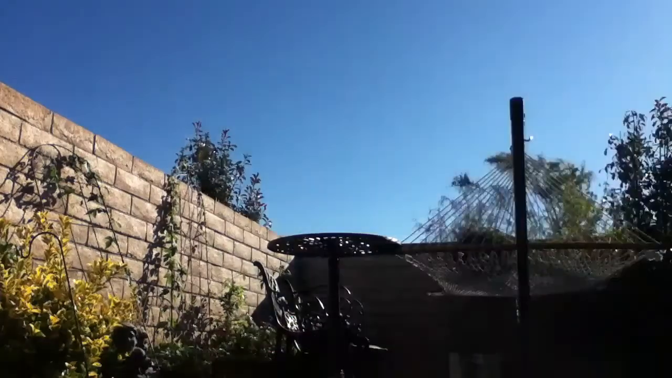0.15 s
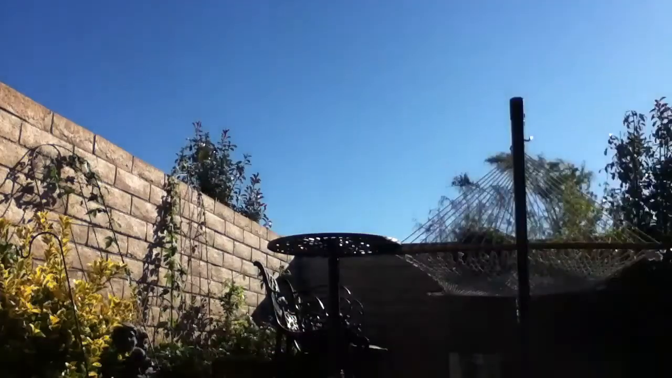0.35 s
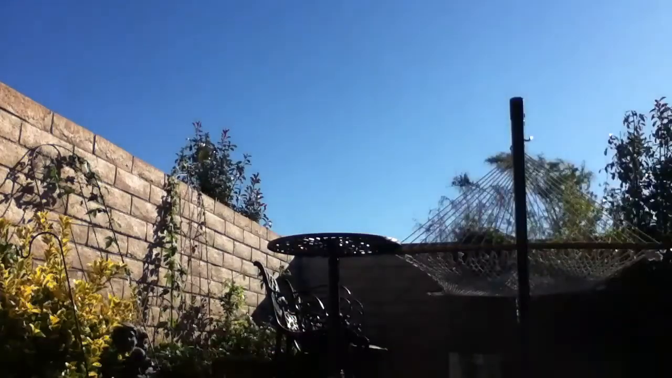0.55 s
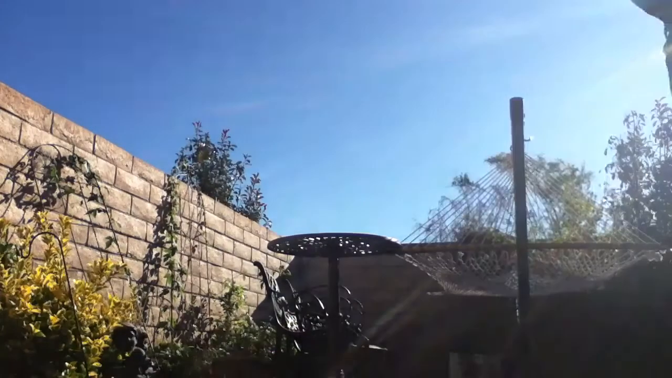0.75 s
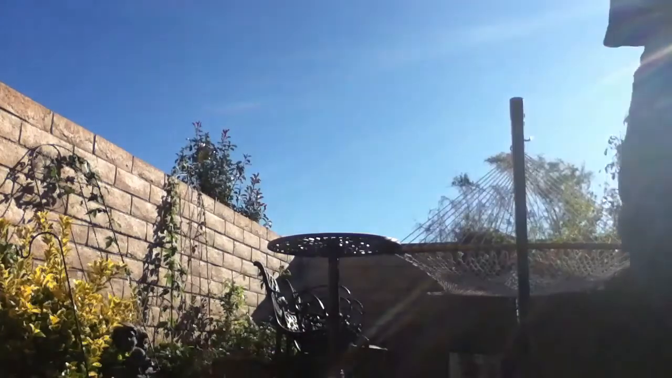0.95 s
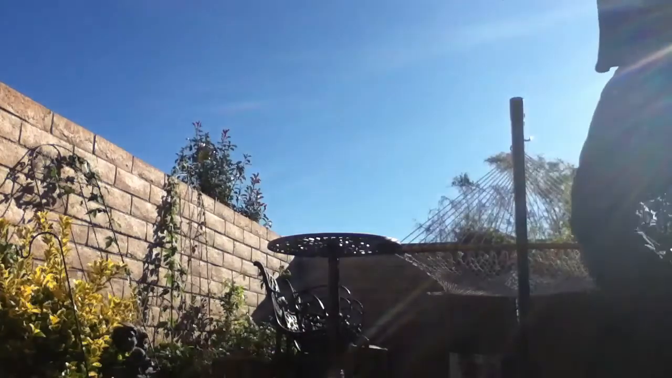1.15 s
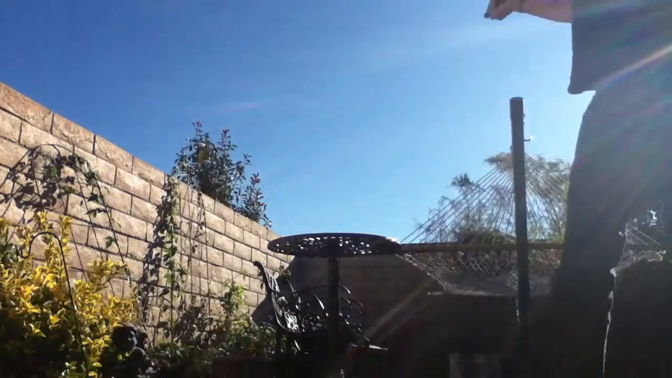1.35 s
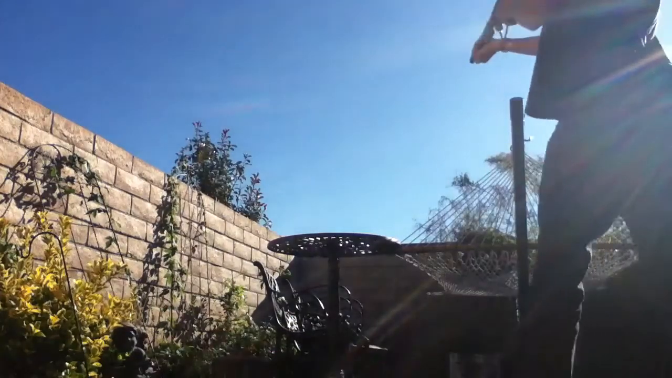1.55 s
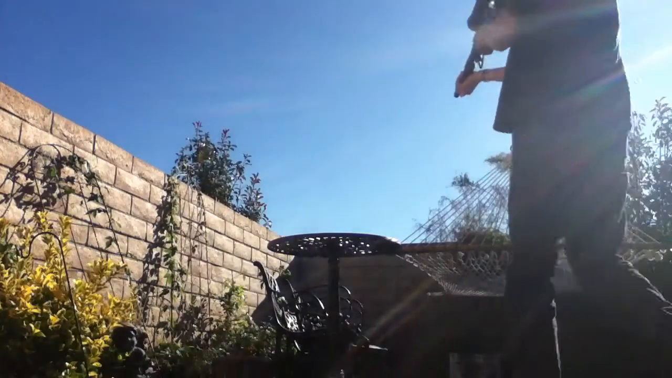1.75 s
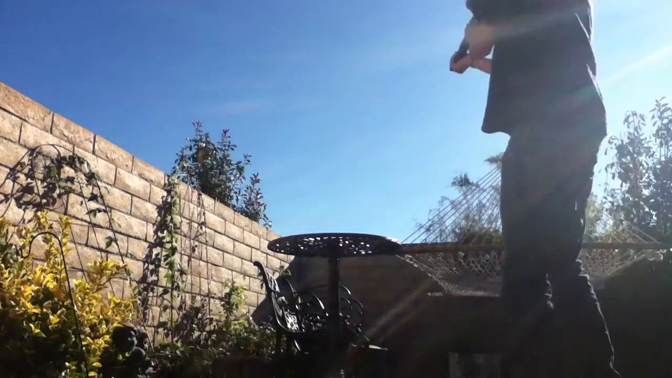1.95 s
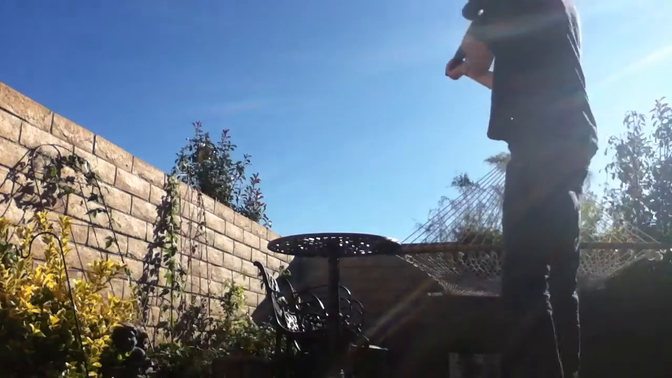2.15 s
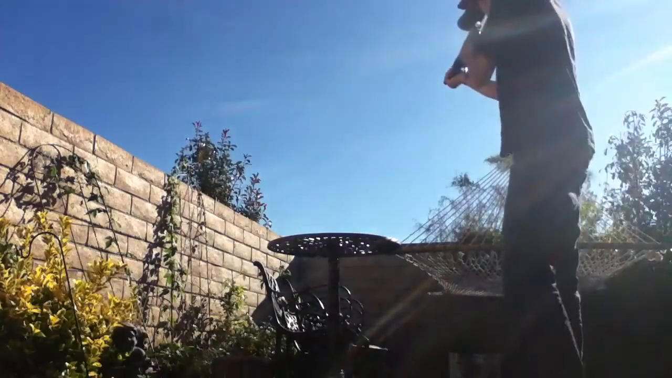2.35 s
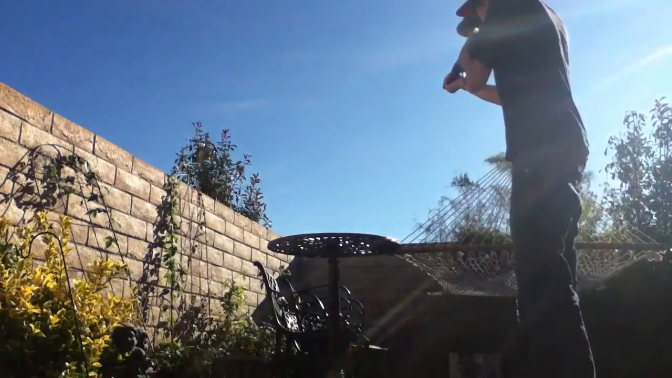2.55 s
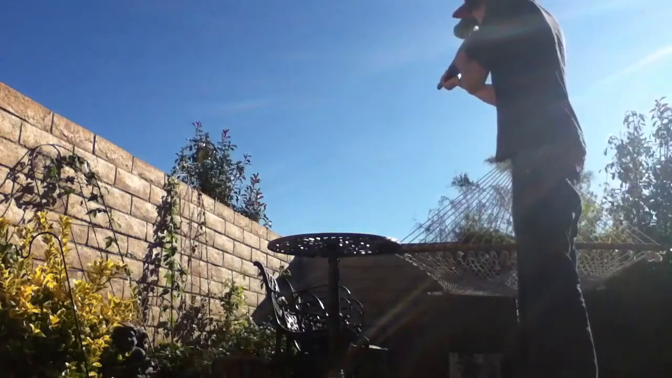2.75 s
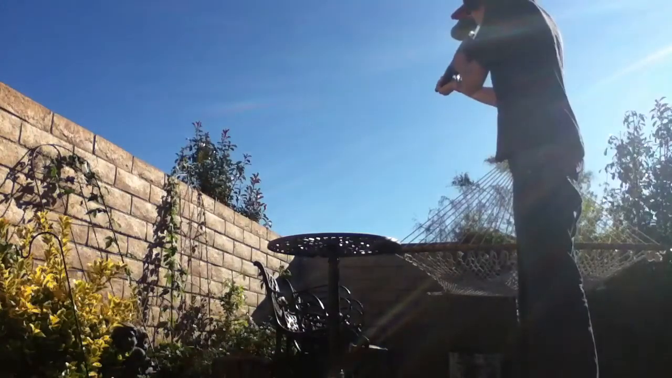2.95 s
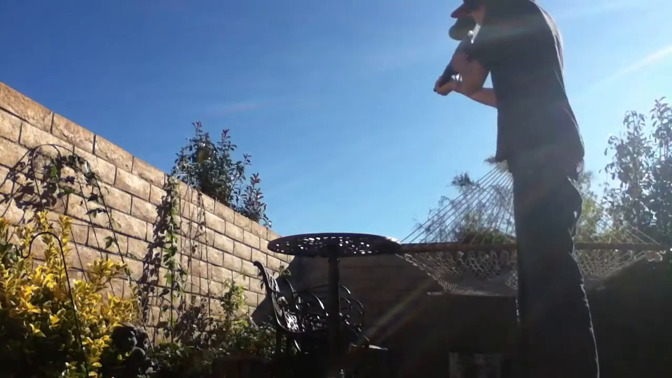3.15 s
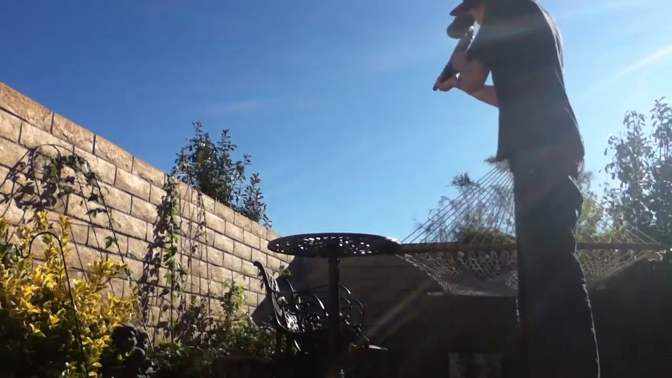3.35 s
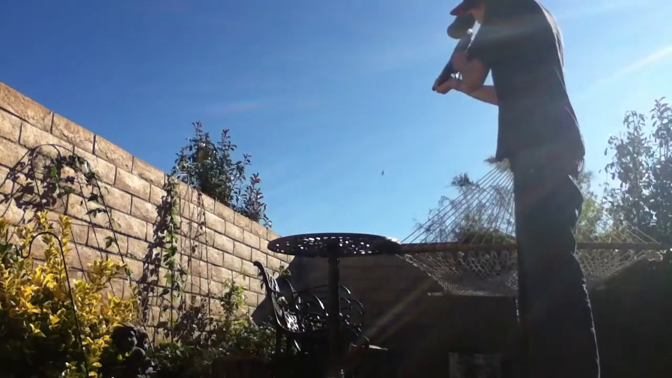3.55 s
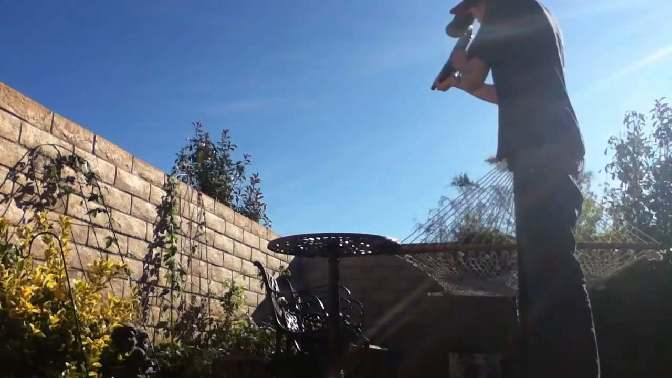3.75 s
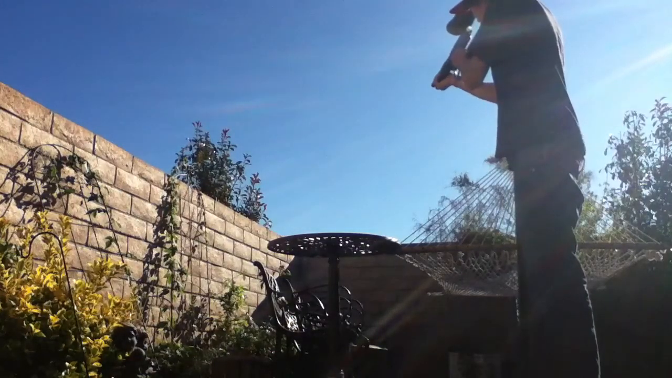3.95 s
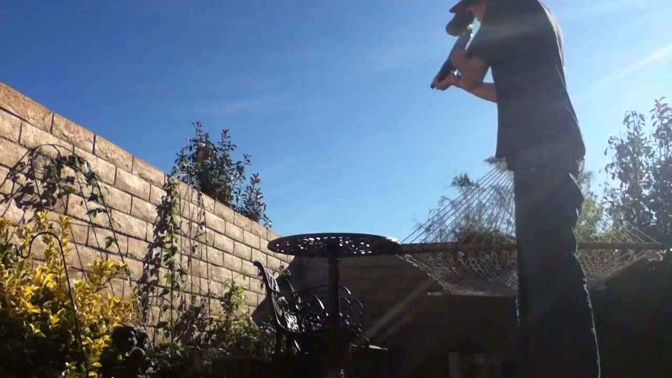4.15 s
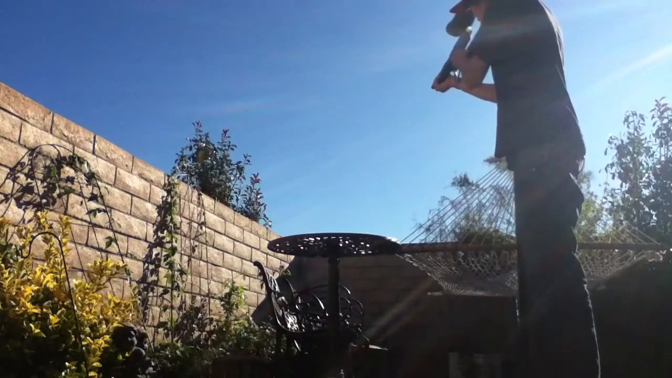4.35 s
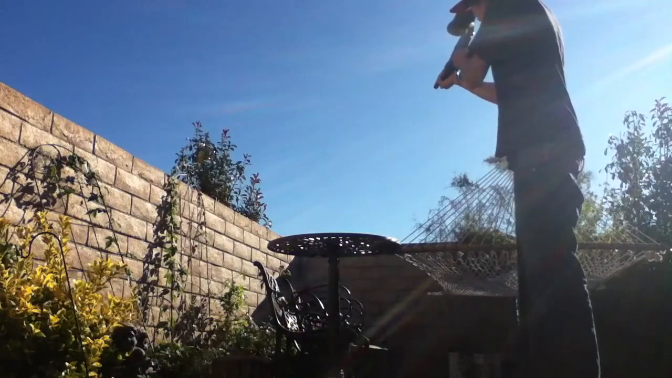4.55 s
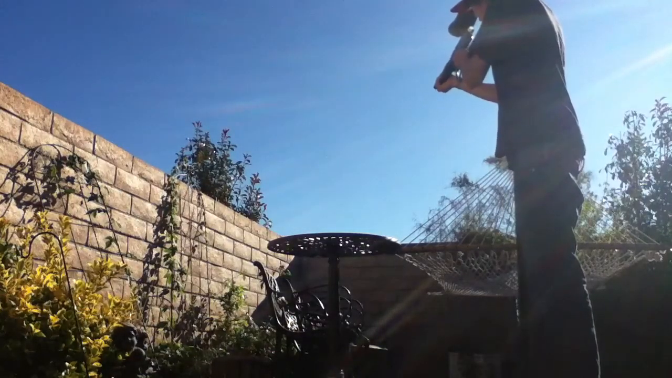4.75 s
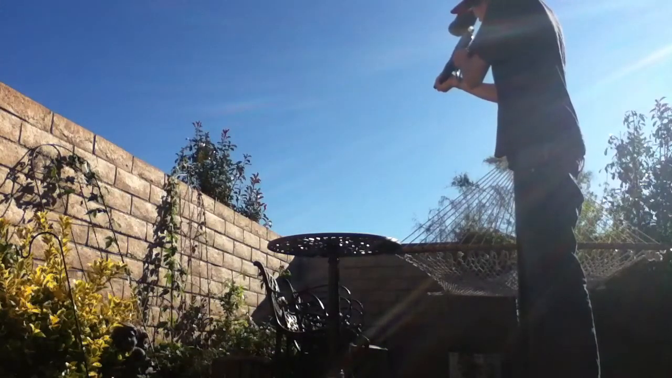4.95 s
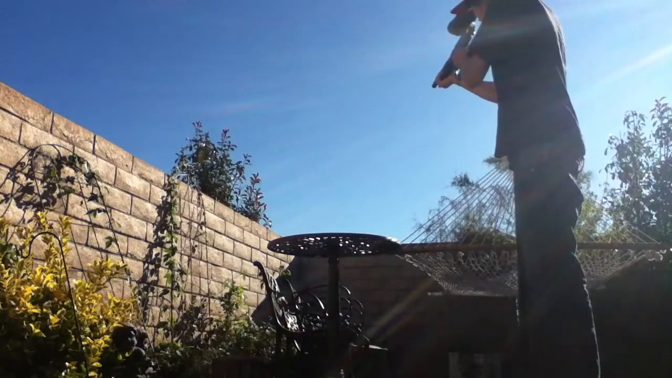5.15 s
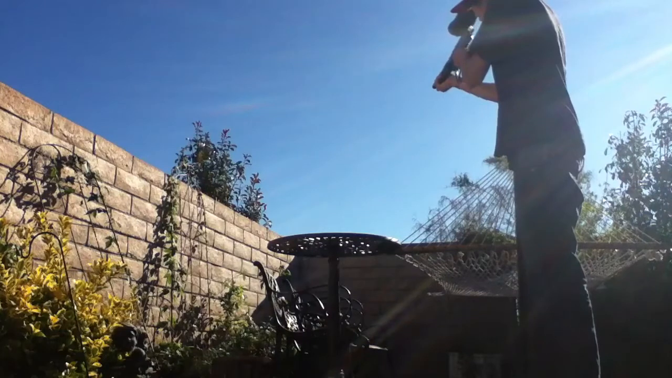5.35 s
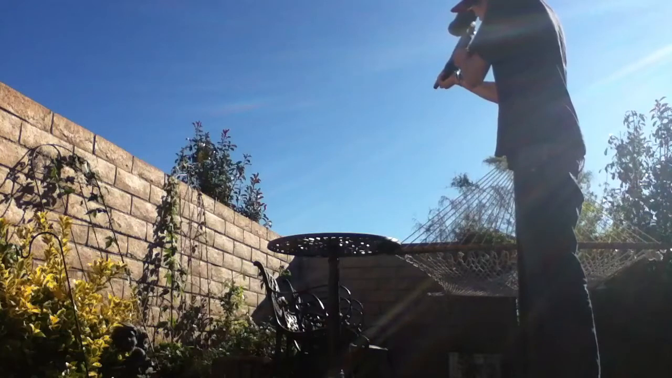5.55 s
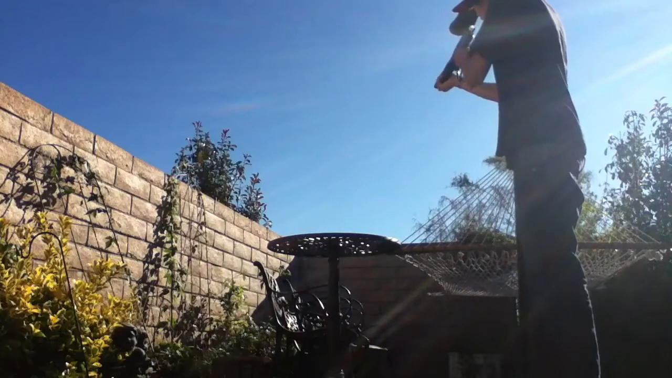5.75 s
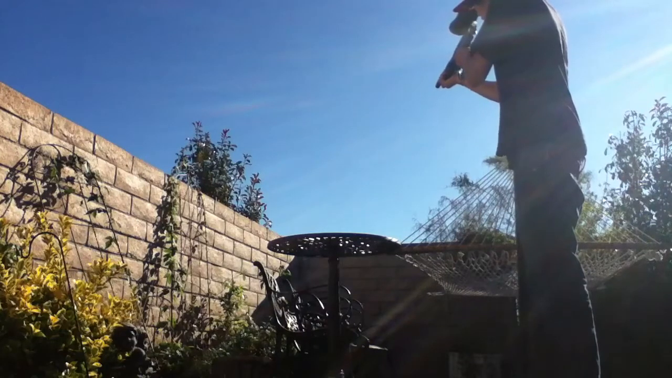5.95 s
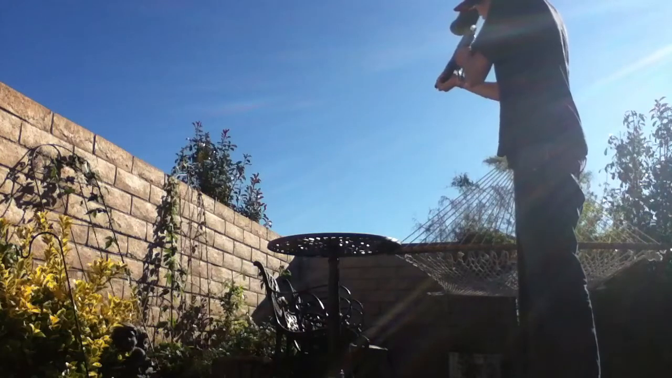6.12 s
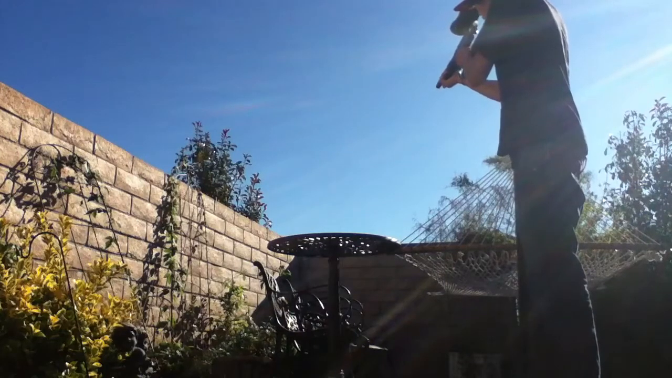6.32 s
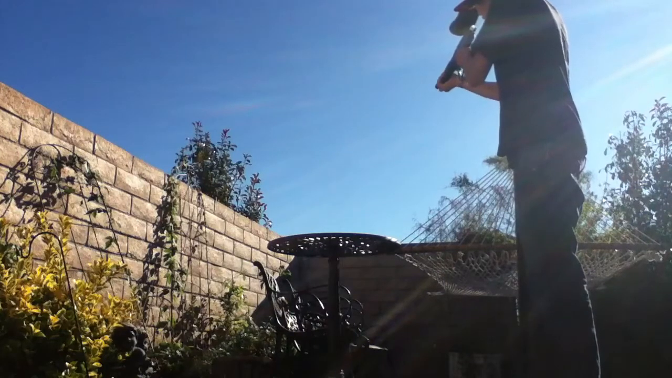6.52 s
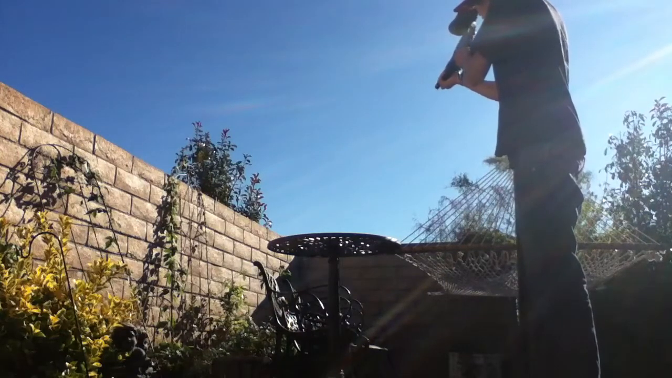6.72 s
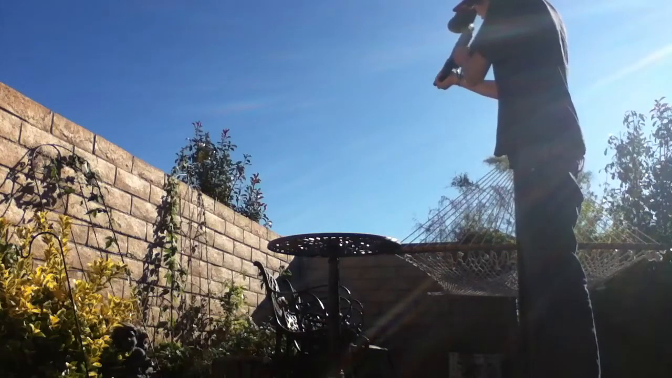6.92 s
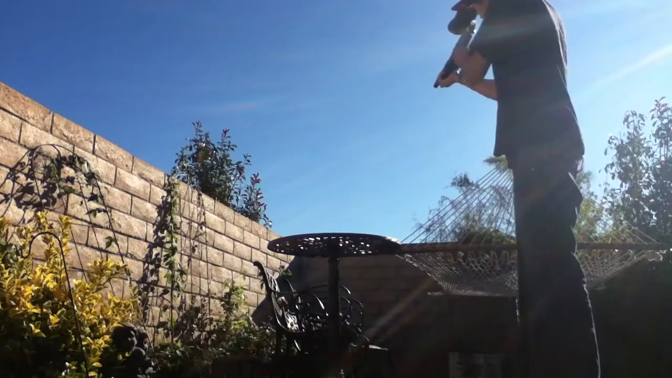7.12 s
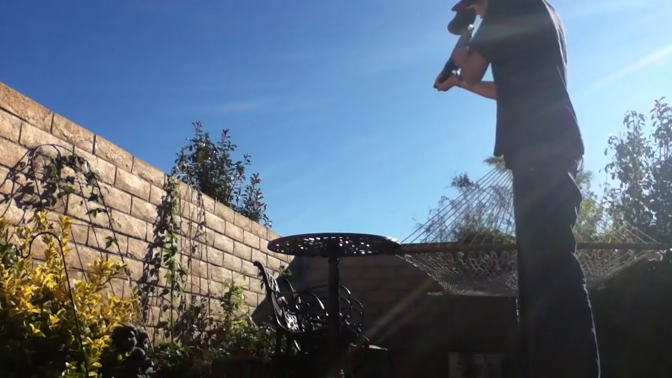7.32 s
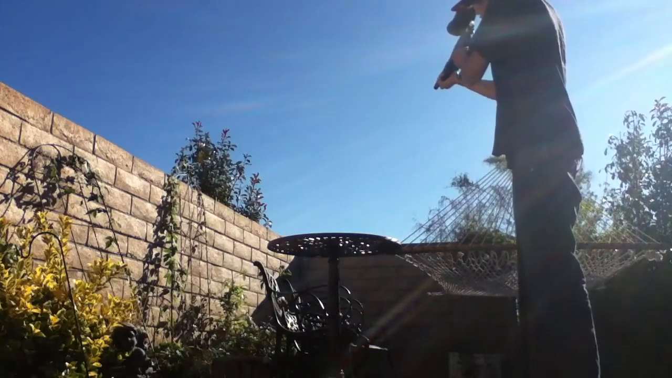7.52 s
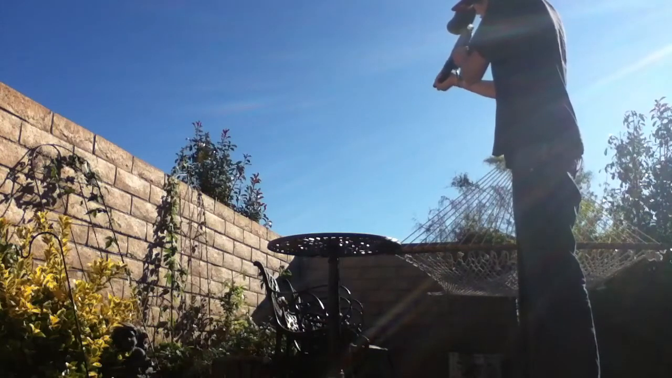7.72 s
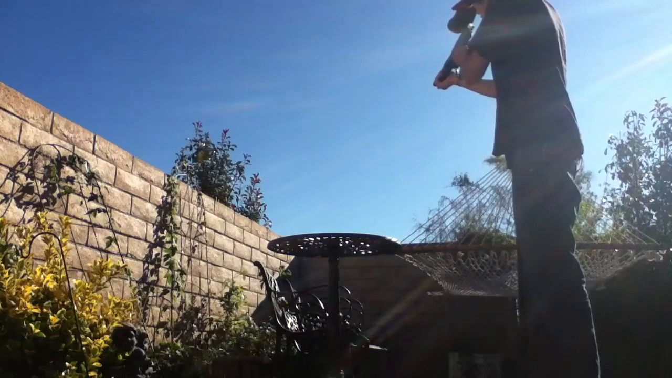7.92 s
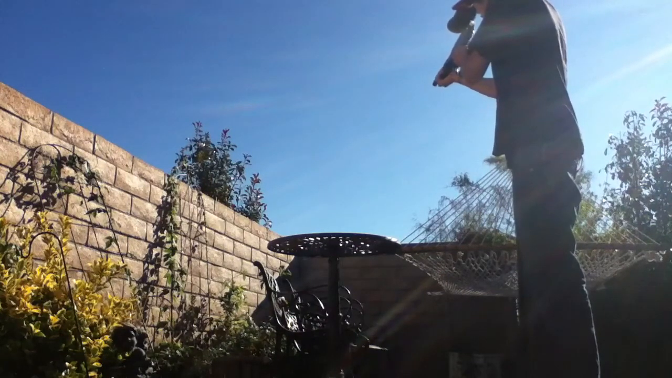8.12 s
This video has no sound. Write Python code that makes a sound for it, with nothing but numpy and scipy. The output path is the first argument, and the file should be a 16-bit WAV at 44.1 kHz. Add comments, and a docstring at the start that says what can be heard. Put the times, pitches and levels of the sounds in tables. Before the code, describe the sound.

After some scraping and soft steps on grass, a paintball gun shoots repeatedly outdoors, with metal clicks between the airy pops.

```python
"""A scrape over a far machine hum: a paintball marker is picked up, carried a few steps over grass
and fired thirteen times in a walled backyard. Before each shot the action latches with a metal click.
Each shot is a muzzle pop with a burst of gas, thrown back by ground, walls and fence;
the ball splats on a far target a tenth of a second later."""
import sys
import numpy as np
from scipy import signal
from scipy.fft import rfft, irfft, next_fast_len
from scipy.io import wavfile
from scipy.ndimage import uniform_filter1d

SR = 44100
rng = np.random.default_rng(int(sys.argv[2]) if len(sys.argv) > 2 else 0)


def to_wav(sig):
    """Store sig (one row per channel, or 1-D mono) as 16-bit WAV at the path in sys.argv[1].

    Samples outside -1..1 are clipped; the rate is SR.
    """
    pcm = np.clip(np.atleast_2d(sig), -1, 1) * 32767
    pcm = np.round(pcm).astype(np.int16)
    wavfile.write(sys.argv[1], SR, pcm.T)  # frames by channels


N = 365148
TIME_S = np.arange(N) / SR
AGE_S = TIME_S[:int(.7 * SR)]   # time within one event

# Trigger pulls. Each row: time in seconds, relative pop level in dB, relative gas level in dB.
SHOTS = [(2.5365, -18.5, -16.5), (3.22, -17, -16.5), (3.6618, -16.5, -16.5), (4.0218, -16.5, -16),
         (4.412, -16, -15.5), (5.0833, -17.5, -17.5), (5.51, -18, -18), (5.9093, -20.5, -18),
         (6.2882, -18, -17), (6.6627, -18.5, -17), (7.0408, -19, -18), (7.4656, -18, -18.5),
         (8.0789, -19, -18)]
# Ground, furniture, walls, fence. Each row: delay in seconds, relative pop and gas levels in dB.
YARD_ECHOES = [(.0044, -1, 2), (.0086, 4.5, 9), (.0099, 1.5, 0), (0.0133, -11, 1), (0.0164, 2.5, -9),
               (0.0305, -11.5, -6), (0.038, 4, 9), (0.0397, 3, -2), (0.0431, -9, 8.5), (.0492, -9, 4.5),
               (0.062, -15.5, -12)]
# Body, ground, furniture near the action. Each row: delay in seconds, relative level in dB.
NEAR_ECHOES = [(.0052, -10.5), (.0085, -12), (0.0123, -11), (0.0265, -17), (.0315, -21.5), (0.0356, -12.5)]
# Rustle of cloth, grass and spray. Each row: frequency in Hz, relative density in dB.
RUSTLE_SPECTRUM = [(500, -6), (2000, -8), (3500, 0.5), (5200, -2.5), (7000, -4), (11000, -4), (16000, -16)]


def from_db(db):
    """Decibels to gain."""
    return 10 ** (np.asarray(db) / 20)


def unit_rms(x):
    """Scale to rms 1."""
    return x / np.sqrt(np.mean(x ** 2) + 1e-20)


def butter(x, hz, kind):
    """Second-order Butterworth filter."""
    return signal.sosfilt(signal.butter(2, hz, kind, fs=SR, output="sos"), x + 1e-18)


def noise(spectrum, size=N):
    """Steady noise, rms 1; the spectrum is interpolated over log frequency."""
    n = next_fast_len(size)
    knots_hz, knots_db = np.transpose(spectrum)
    colour_db = np.interp(np.log(np.fft.rfftfreq(n, 1 / SR) + 1e-9), np.log(knots_hz), knots_db)
    return unit_rms(irfft(rfft(rng.standard_normal(n)) * from_db(colour_db), n)[:size])


def drift(rate_hz):
    """Random wander with a spread near 1."""
    return np.interp(TIME_S * rate_hz, np.arange(4096), rng.standard_normal(4096))


def fade(t60_s, delay_s=0):
    """A delayed step that dies by 60 dB in t60_s."""
    return (AGE_S >= delay_s) * from_db(-60 * np.maximum(AGE_S - delay_s, 0) / t60_s)


def ring(modes):
    """One blow on a set of damped modes."""
    return sum(from_db(db) * fade(t60_s) * np.sin(2 * np.pi * hz * AGE_S) for hz, db, t60_s in modes)


def swells(gestures, roundness=1.19):
    """Gain of rubbing gestures, each 20 dB down one rise time before its peak and one fall time after."""
    gain = np.zeros(N)
    for peak_s, db, rise_s, fall_s in gestures:
        distance = np.maximum((peak_s - TIME_S) / rise_s, (TIME_S - peak_s) / fall_s).clip(0, 10)
        gain += from_db(db - 20 * distance ** roundness)
    return gain


def play(events, sound, power=1):
    """The same sound at each (seconds, dB); a power near 2 sums energies."""
    track = np.zeros(N)
    for s, db in events:
        start = round(s * SR)
        track[start:start + len(sound)] += from_db(db) ** power * sound[:N - start]
    return track


def reflect(sound, echoes, echo_db, power=1):
    """A short sound followed by its reflections."""
    return sound + play([(delay_s, db + echo_db) for delay_s, db in echoes], sound, power)[:len(AGE_S)]


def bursts(events, envelope, spectrum, echoes, echo_db, scatter_db, direct=1,
           build_up_s=.011, loss_db_per_s_khz=9.5):
    """Noise bursts in the yard: rough walls add echoes as energy; air and foliage dull the tail."""
    # Diffuse return of near walls and far surroundings. Each row: relative level in dB, t60 in seconds.
    returns = [(-6.5, 0.42), (-22.5, 0.91)]
    early = direct * reflect(envelope ** 2, echoes, echo_db, power=1.87)
    build_up = np.minimum(AGE_S / build_up_s, 1) ** 2
    diffuse = sum((from_db(db + scatter_db) * build_up * fade(t60_s)) ** 2 for db, t60_s in returns)
    lumps = from_db(3.94 * drift(408.5)[:len(AGE_S)]) ** 2   # shrubs and furniture
    tail = np.abs(signal.fftconvolve(envelope ** 2, diffuse * lumps / (SR / 1000))[:len(AGE_S)])
    size = next_fast_len(N)
    colour = rfft(noise(spectrum, size))
    hz = np.fft.rfftfreq(size, 1 / SR)
    edges_hz = [20, 1500, 4000, 7000, 10000, 17000]
    track = np.zeros(N)
    for low, high in zip(edges_hz, edges_hz[1:]):
        loss = from_db(-loss_db_per_s_khz * np.sqrt(low * high) / 1000 * AGE_S)
        band = irfft(colour * (hz >= low) * (hz < high), size)[:N]
        track += band * np.sqrt(play(events, early + tail * loss ** 2, power=1.967))
    return track


def background(waver_rad=.28, waver_db=.05, whine_hz=14992, whine_db=-81, murmur_db=-49.5):
    """Murmur of air and far traffic, a wavering machine hum and a thin whine of electronics."""
    # Outdoor murmur. Each row: frequency in Hz, relative density in dB.
    murmur_spectrum = [(15, -69), (25, -16), (50, -35.5), (102, -5), (317, -11.5), (384, -12), (489, -16.5),
                       (575, -16), (714, -17), (936, -18), (1020, -12.5), (2160, -33), (10700, -43),
                       (14800, -45), (16000, -40)]
    # Machine hum. Each row: frequency in Hz, level in dB relative to the contour.
    partials = [(89, 2), (119.5, -10.5), (178, -7.5), (267, -7.5), (356, -14), (446, -10.5)]
    # Hum loudness. Each row: time in seconds, level in dB.
    contour = [(0, -49), (.8, -47.5), (1.2, -52), (3.6, -51.5), (4.95, -45), (6.3, -51.5), (8.28, -51.5)]
    hum = np.zeros(N)
    for hz, db in partials:
        gain = from_db(db + waver_db * drift(5.3))
        hum += gain * np.sin(2 * np.pi * hz * TIME_S + waver_rad * drift(13))
    hum *= from_db(np.interp(TIME_S, *np.transpose(contour)))
    whine = from_db(whine_db) * np.sin(2 * np.pi * whine_hz * TIME_S)
    return np.sqrt(2) * (hum + whine) + from_db(murmur_db) * noise(murmur_spectrum)


def steps(grain_db=2.3):
    """Shoes scuff through the grass; cloth and blades swish."""
    # Footfalls and swishes. Each row: peak time in seconds, level in dB, rise and fall in seconds.
    footfalls = [(1.91, -37, 0.11, 0.16), (2.2, -42, 0.15, .5)]
    swishes = [(.25, -53.5, 0.31, 0.19), (1.84, -62, .03, .2), (2.21, -57, 0.086, 0.077),
               (2.34, -58, .05, 0.096)]
    # Shoe on grass. Each row: frequency in Hz, relative density in dB.
    scuff_spectrum = [(100, -19), (330, -21.5), (450, 5), (800, 5), (1400, 6), (2000, -11.5), (5000, -20),
                      (16000, -40.5)]
    grain = from_db(grain_db * drift(150))
    return grain * (swells(footfalls) * noise(scuff_spectrum) + swells(swishes) * noise(RUSTLE_SPECTRUM))


def scrape(slips_per_s=1400, size_db=2.5, grit_db=-19, grit_hz=(3200, 6000), rustle_db=-26):
    """Uneven slips and a few bumps ring the scraped surface; the slips rasp as grit over a rustle."""
    # Scraped surface. Each row: frequency in Hz, relative level in dB, t60 in seconds.
    modes = [(443, -27, .05), (724, 8.5, 0.045), (780, 13, 0.047), (1015, 15.5, 0.0097), (1240, -4, 0.045),
             (1363, 0.5, 0.025), (1670, -24.5, 0.016), (3000, -14, .012), (5170, -14, .012)]
    # Light slide, hard drag. Each row: peak time in seconds, level in dB, rise and fall in seconds.
    slides = [(.49, -39, 0.67, 0.16), (.565, -27, 0.06, 0.65)]
    # The marker catching on the way. Each row: start in seconds, peak level in dB.
    bumps = [(0.535, -16), (0.579, -14.5), (0.614, -17), (0.685, -16), (0.747, -17.5), (0.806, -19)]
    slips = (rng.random(N) < slips_per_s / SR) * rng.choice([-1, 1], N)
    slips = slips * from_db(size_db * np.minimum(rng.exponential(1, N), 4))
    slips *= from_db(2.1 * drift(70.5))   # the contact catches and lets go
    surface = butter(ring(modes), 570, "high")
    body = unit_rms(signal.fftconvolve(slips, surface)[:N])
    grit = unit_rms(butter(slips * from_db(2.2 * drift(200)), grit_hz, "band"))
    rubbing = body + from_db(grit_db) * grit + from_db(rustle_db) * noise(RUSTLE_SPECTRUM)
    return swells(slides) * rubbing + play(bumps, surface / np.abs(surface).max())


def knocks():
    """Handling the marker: a dull knock and a bright tick in varying shares."""
    # Contacts. Each row: start in seconds, knock level in dB, tick level in dB.
    contacts = [(0.562, -21.5, -37), (0.598, -24.5, -36), (0.845, -22, -20), (0.867, -29, -23.5),
                (0.972, -30, -26.5), (1.312, -38, -58), (1.709, -45.5, -50), (1.825, -44, -39),
                (2.827, -32.5, -28), (2.843, -26, -21.5), (2.935, -33, -34), (3.466, -35.5, -33.5),
                (4.681, -32, -27.5), (7.302, -37.5, -34)]
    # Knock and tick colours. Each row: frequency in Hz, relative density in dB.
    knock_spectrum = [(100, -21.5), (400, -15), (750, -1.5), (1400, -4), (2200, -12.5), (6000, -26),
                      (16000, -51)]
    tick_spectrum = [(500, -15), (2000, -10.5), (4500, 4), (7500, 2), (11000, -6.5), (16000, -24)]
    knock = bursts([(s, db) for s, db, _ in contacts], fade(.035), knock_spectrum, NEAR_ECHOES,
                   echo_db=-12.5, scatter_db=-11.5)
    tick = bursts([(s, db) for s, _, db in contacts], fade(.034), tick_spectrum, NEAR_ECHOES,
                  echo_db=-2.5, scatter_db=-14)
    return knock + tick


def latches(chatter_s=.003, spring_hz=(5300, 6550), spring_db=-37, spring_t60_s=.25):
    """The catch chatters home and leaves the action and its spring ringing."""
    # Latch clicks. Each row: start in seconds, relative level in dB.
    clicks = [(1.0478, -7.5), (3.0122, -13), (3.5507, -14.5), (3.9064, -12), (4.2942, -10.5),
              (4.7633, -12.5), (5.374, -16), (5.794, -14), (6.1789, -14), (6.5811, -13.5), (6.9339, -12.5),
              (7.3892, -15), (7.7612, -15)]
    # Metal of the action. Each row: frequency in Hz, relative level in dB, t60 in seconds.
    modes = [(622, -22, 0.096), (695, -24.5, 0.17), (1233, -14.5, 0.06), (1288, -13.5, 0.065),
             (1377, -21.5, 0.022), (1877, -8.5, 0.03), (5360, 0.5, 0.019), (5700, -31.5, 0.2),
             (6186, 2.5, 0.014), (6250, -27.5, 0.2), (13000, -13.5, 0.0087)]
    # Snap of the catch. Each row: frequency in Hz, relative density in dB.
    snap_spectrum = [(100, -41), (500, 5), (700, 6), (2000, 6.5), (2400, 1.5), (3600, -1.5), (4900, 7),
                     (5400, 2.5), (5750, 10.5), (6250, 4), (7200, 3.5), (8500, -3), (14000, -5),
                     (16000, -27)]
    spring = ring([(hz * rng.uniform(.99, 1.01), spring_db, spring_t60_s)
                   for hz in np.linspace(*spring_hz, num=10)])
    attack = 1 - np.exp(-AGE_S / .00067)
    metal = reflect((ring(modes) + spring) * attack, [(.0085, -25)], echo_db=-10)
    envelope = (AGE_S < chatter_s) + from_db(-10.5) * fade(.17)
    snap = bursts(clicks, envelope, snap_spectrum, NEAR_ECHOES, echo_db=3, scatter_db=-14.5)
    return play(clicks, metal) + from_db(-12) * snap


def splats(crush_s=.0012, spray_db=-29, spray_t60_s=.49):
    """Each ball crushes against the far target, the ground repeats it, and the spray patters down."""
    # Balls landing. Each row: start in seconds, relative level in dB.
    impacts = [(2.6373, -26), (3.3268, -21.5), (3.7655, -25.5), (4.1245, -24), (4.5146, -21.5),
               (5.1962, -26), (5.6122, -29.5), (6.0137, -25.5), (6.3891, -25.5), (6.7701, -23),
               (7.1466, -23), (7.5692, -28), (8.1874, -23.5)]
    # Crushing ball. Each row: frequency in Hz, relative density in dB.
    splat_spectrum = [(150, -6), (600, 3.5), (1400, 6), (2300, 1), (4000, 2), (6800, 3.5), (9000, -3.5),
                      (12000, -7.5), (16000, -22)]
    envelope = AGE_S / crush_s * np.exp(1 - AGE_S / crush_s) + from_db(-22.5) * fade(.1)
    hits = bursts(impacts, envelope, splat_spectrum, [(.0122, -13)], echo_db=-5, scatter_db=-5.5)
    spray = play(impacts, fade(spray_t60_s)) * from_db(spray_db + drift(120)) * noise(RUSTLE_SPECTRUM)
    return hits * from_db(drift(200)) + spray


def muzzle_pops(lead_s=.00101, pop_gain_db=2,
                thump_hz=150, thump_rise_s=.0036, thump_lead_s=.0032, thump_gain_db=-1.5):
    """Air ahead of the ball pops out of the barrel; the expanding cloud adds a low thump."""
    # Air in and around the barrel. Each row: frequency in Hz, relative level in dB, t60 in seconds.
    modes = [(385, -13.5, 0.096), (515, -12.5, 0.053), (619, -19, 0.058), (658, -8.5, 0.016),
             (726.4, -19.5, 0.18), (872, -60, 0.049), (1098, -13.5, 0.1), (1170, -8.5, 0.042),
             (1100, -36, 0.26), (1390, -35, 0.059)]
    # The pop's diffuse return. Each row: frequency in Hz, relative density in dB.
    tail_spectrum = [(60, -60), (150, 3), (250, -6), (400, -13.5), (520, -3.5), (800, -10), (900, -21),
                     (1050, 8), (1250, -10), (1600, -4.5), (2400, -10), (6000, -33.5)]
    events = [(s - lead_s, db) for s, db, _ in SHOTS]
    echoes = [(delay_s, db) for delay_s, db, _ in YARD_ECHOES]
    pop = reflect(butter(ring(modes), 380, "high"), echoes, echo_db=1.5)
    swell = (AGE_S / thump_rise_s / 2) ** 2 * np.exp(2 - AGE_S / thump_rise_s)
    cloud = butter(swell * np.sin(2 * np.pi * thump_hz * AGE_S), 126, "high")
    thump = reflect(cloud, [(.0405, -16.5)], echo_db=-5.5)
    thumps = play([(s - thump_lead_s, db) for s, db in events], thump)
    tail = bursts(events, fade(.015), tail_spectrum, [], echo_db=0, scatter_db=-1.5, direct=0)
    return from_db(pop_gain_db) * play(events, pop) + from_db(thump_gain_db) * thumps + tail


def gas_bursts(leak_s=.0077, leak_db=-16, crack_rise_s=.0008, jet_db=-12, gain_db=4):
    """The valve leaks more and more, the gas cracks out behind the ball, then the barrel empties."""
    # Escaping gas. Each row: frequency in Hz, relative density in dB.
    gas_spectrum = [(150, -42), (500, 5), (1500, 4.5), (2200, -11.5), (3100, -0.5), (4500, -1), (6600, -1),
                    (8200, -6), (10500, -8.5), (13000, -14), (16000, -38.5)]
    leaking = AGE_S < leak_s
    leak = from_db(leak_db) * AGE_S / leak_s * leaking
    opening = np.clip(1 + (AGE_S - leak_s) / crack_rise_s, 0, 1) * leaking
    crack = opening + fade(.0049, delay_s=leak_s)
    jet = from_db(jet_db) * fade(.058, delay_s=leak_s)
    events = [(s - leak_s, db + gain_db) for s, _, db in SHOTS]
    echoes = [(delay_s, db) for delay_s, _, db in YARD_ECHOES]
    return bursts(events, leak + crack + jet, gas_spectrum, echoes,
                  echo_db=-6.5, scatter_db=-2.5, direct=.91)


def scene(firing_gain_db=6.5, latch_gain_db=3):
    """Firing, handling and background, in mono."""
    firing = from_db(firing_gain_db) * (muzzle_pops() + gas_bursts() + splats())
    handling = from_db(latch_gain_db) * latches() + knocks() + scrape() + steps()
    return (firing + handling + background())[None]


def record(dry, threshold_db=-11.5, release_db_per_s=8, cutoff_hz=16000):
    """A limiter ducks on loud bursts and creeps back; peaks are soft-clipped and the top is cut."""
    power = np.abs(uniform_filter1d(dry[0] ** 2, size=130))
    over_db = np.maximum(10 * np.log10(power + 1e-12) - threshold_db, 0)
    release_db = release_db_per_s * TIME_S
    reduction_db = np.maximum.accumulate(over_db + release_db) - release_db
    limited = np.tanh(dry * from_db(-uniform_filter1d(reduction_db, size=45)))
    return signal.sosfilt(signal.ellip(10, .1, 80, cutoff_hz, fs=SR, output="sos"), limited)


dry = scene()
out = record(dry)
to_wav(out)
```